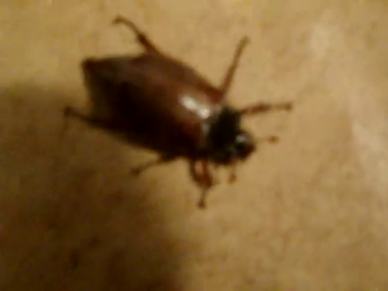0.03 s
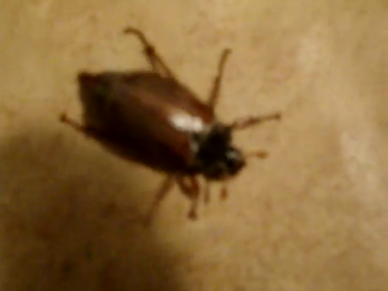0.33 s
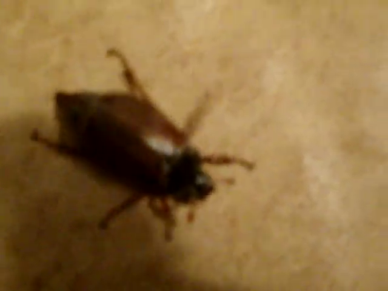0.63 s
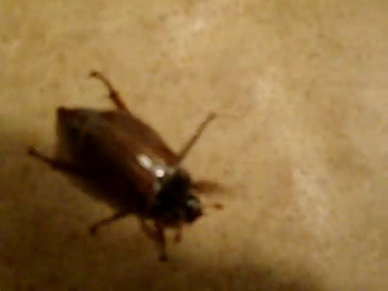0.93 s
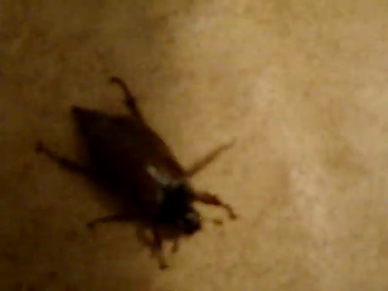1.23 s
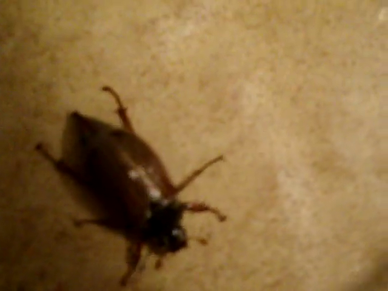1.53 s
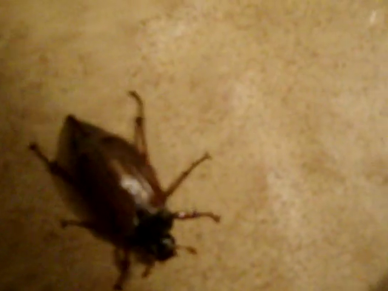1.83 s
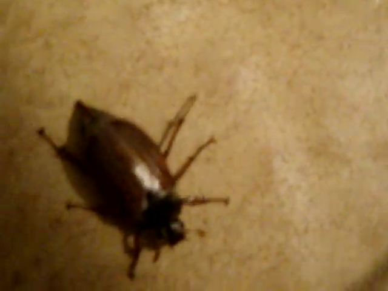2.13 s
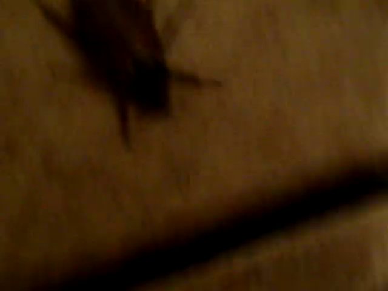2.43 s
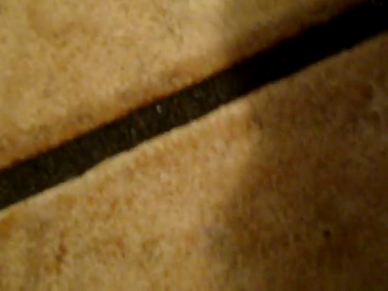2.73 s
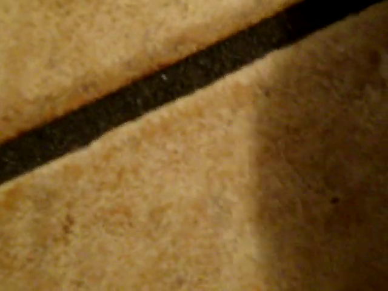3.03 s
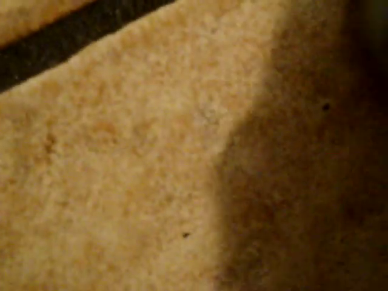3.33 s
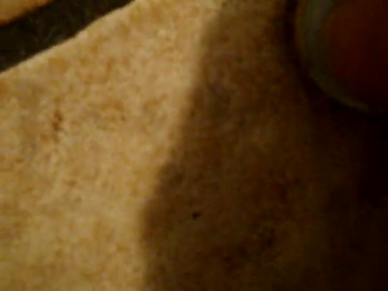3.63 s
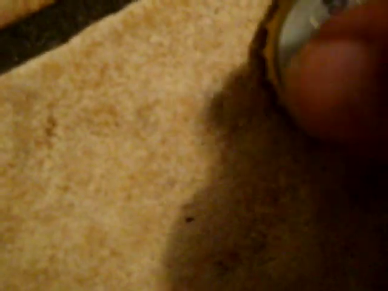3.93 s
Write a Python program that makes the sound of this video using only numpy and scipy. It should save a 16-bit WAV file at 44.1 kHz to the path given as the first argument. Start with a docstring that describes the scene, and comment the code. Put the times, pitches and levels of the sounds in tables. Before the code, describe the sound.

Fingers rub, scrape and squeak on a plastic casing right at the microphone, with a few sharp knocks. Before that, a quiet room holds only faint dry ticks, soft bumps and hand brushing over hiss and a thin hum.

```python
"""Fingers shift on a plastic casing close by, from 3.3 s: skin sticks and slips in a grainy rub, short
scrapes and squeaks that ring the casing, with a few sharp knocks. Before that, a quiet room where a
beetle is watched on a tiled floor: faint dry ticks, soft bumps and brushing of the hand.
Hiss and a thin hum run throughout."""
import sys
import numpy as np
from scipy import signal
from scipy.fft import rfft, irfft
from scipy.io import wavfile
from scipy.ndimage import uniform_filter1d

SR = 44100
rng = np.random.default_rng(int(sys.argv[2]) if len(sys.argv) > 2 else 0)


def output_pcm(signal):
    """Save a mono or channel-first signal as 16-bit PCM at the path in sys.argv[1].

    Samples are clipped to [-1, 1] before scaling.
    """
    pcm = np.clip(np.atleast_2d(signal).T, -1, 1) * 32767
    wavfile.write(sys.argv[1], SR, np.round(pcm).astype(np.int16))


N = 176400
TIME = np.arange(N) / SR


def fingers():
    """Skin on plastic: a broad rub, then thin scrapes, lower squeaks and crunches as the grip tightens."""
    # envelopes, one per stroke: t/s, level/dB
    rub_stroke = [(3.306, -59), (3.311, -22.5), (3.332, -26), (3.35, -19), (3.362, -16.5), (3.379, -18.5),
                  (3.386, -25), (3.42, -22.5), (3.445, -34), (3.468, -41.5), (3.485, -33.5), (3.507, -28.5),
                  (3.515, -20.5), (3.535, -26), (3.55, -23), (3.565, -30.5), (3.58, -85)]
    scrape_strokes = [
        [(3.638, -71), (3.643, -32), (3.652, -25), (3.657, -30), (3.665, -19.5), (3.672, -32.5), (3.68, -62),
         (3.684, -66)],
        [(3.692, -66), (3.707, -47), (3.718, -42), (3.73, -62)],
        [(3.768, -51), (3.779, -29.5), (3.789, -32), (3.797, -28.5), (3.806, -34), (3.812, -18.5),
         (3.83, -27.5), (3.842, -38), (3.862, -47)],
        [(3.868, -48), (3.893, -33), (3.908, -38), (3.918, -49)],
        [(3.925, -50), (3.935, -44), (3.948, -32), (3.962, -45), (3.97, -57)],
    ]
    squeak_strokes = [
        [(3.803, -42), (3.81, -32), (3.824, -21), (3.83, -23), (3.837, -18.5), (3.853, -38), (3.862, -36),
         (3.89, -29), (3.908, -42), (3.915, -61)],
        [(3.918, -37), (3.928, -36), (3.938, -27.5), (3.949, -24.5), (3.955, -52.5), (3.962, -65), (3.97, -72)],
        [(3.976, -63.5), (3.982, -23), (3.987, -48), (3.993, -47), (4.0, -48)],
    ]
    crunch_strokes = [
        [(3.806, -53), (3.81, -28), (3.819, -23), (3.824, -42), (3.832, -27.5), (3.841, -23), (3.85, -47)],
        [(3.928, -55), (3.934, -40), (3.944, -34), (3.953, -50), (3.958, -61)],
    ]
    # friction spectra: f/Hz, level/dB
    rub_colour = [(300, -46.5), (1100, -21.5), (1900, -12), (2600, 2.5), (3050, -3.5), (3650, 5),
                  (4550, -1), (5100, -11), (5900, -12.5), (7800, -32.5), (9400, -25), (10200, -57)]
    scrape_colour = [(400, -39), (1200, -26), (2400, -5), (3400, -3), (4600, 11.5), (5300, -14.5),
                     (7200, -26), (9500, -17.5), (10300, -34)]
    squeak_colour = [(400, -37), (1400, 3), (2300, -3), (3100, 20.5), (4000, -2), (4600, 10), (5400, -16),
                     (6300, -2), (7500, 5), (8800, -9), (10200, -20)]
    crunch_colour = [(500, 5), (1500, -7), (2600, 9.5), (4800, 3), (5600, -12), (6600, 2.5), (9400, 12),
                     (10200, -13)]
    # casing modes per grip: f/Hz, width/Hz, level/dB
    rub_modes = [(2500, 150, -22), (3575, 39, 14), (3800, 60, -17), (4330, 56, -2)]
    scrape_modes = [(4560, 260, 13), (4390, 140, -10)]
    squeak_modes = [(3310, 84, 9), (3200, 240, -1), (7340, 260, -25)]
    rub = friction(rub_colour, rub_modes, slips_per_s=1150,
                   ring_db=-11.5, even_s=0.0099, crackle_db=1, flicker_db=12.5)
    scrape = friction(scrape_colour, scrape_modes, slips_per_s=750,
                      ring_db=-5, even_s=0.005, crackle_db=4.5, flicker_db=10)
    squeak = friction(squeak_colour, squeak_modes, slips_per_s=600,
                      ring_db=4.5, even_s=0.0032, crackle_db=-2, flicker_db=10.5)
    crunch = friction(crunch_colour, scrape_modes, slips_per_s=910,
                      ring_db=-3.5, even_s=0.0069, crackle_db=3, flicker_db=-1)
    rub *= envelope(rub_stroke)
    scrape *= sum(map(envelope, scrape_strokes))
    squeak *= sum(map(envelope, squeak_strokes))
    crunch *= sum(map(envelope, crunch_strokes))
    low_cut = signal.butter(2, 1300, "high", fs=SR, output="sos")
    return signal.sosfilt(low_cut, rub + scrape + squeak + crunch)


def friction(spectrum, modes, slips_per_s, ring_db, even_s, crackle_db, flicker_db):
    """Stick-slip at unit level: unevenly timed slips shed ringing grains and excite the casing modes."""
    count, slip_spread_db, grain_spread_db, grit_db = 8000, 4, 7, -16
    clumps_per_s, flickers_per_s, treble_hz = 280, 130, 5400
    onsets = (np.cumsum(rng.gamma(2, 0.5, count)) / slips_per_s * SR).astype(int)
    inside = onsets < N
    sizes = from_db(slip_spread_db * np.clip(rng.standard_normal(count), -2, 1))
    grains = np.zeros(N)
    for hz in np.linspace(1500, 10000, 16):  # each slip favours its own few pitches
        share = from_db(grain_spread_db * np.minimum(rng.standard_normal(count), 1.5))
        kicks = sizes * share * rng.choice([-1, 1], count)
        grains += resonate(np.bincount(onsets[inside], kicks[inside], N), hz, width_hz=440)
    drive = unit_rms(grains) + from_db(grit_db) * rng.standard_normal(N)
    ringing = sum(from_db(db) * unit_rms(resonate(drive, hz, width_hz)) for hz, width_hz, db in modes)
    snaps = unit_rms(colour(drive, spectrum))
    dull = signal.sosfiltfilt(signal.butter(4, treble_hz, fs=SR, output="sos"), snaps)
    flicker = from_db(flicker_db * np.minimum(drift(flickers_per_s), 1))
    treble = (snaps - dull) * flicker
    clumps = from_db(crackle_db * drift(clumps_per_s))
    return even(clumps * (dull + treble + from_db(ring_db) * unit_rms(ringing)), even_s)


def knocks():
    """Hard contacts carried through the casing, bass included."""
    # impulses: t/s, relative level/dB
    hits = [(3.3097, -7), (3.811, -7.5), (3.8152, -11), (3.8272, 1.5), (3.832, -12), (3.8388, -12.5),
            (3.943, -6)]
    # casing response: f/Hz, level/dB
    casing_colour = [(30, -8.5), (150, -2), (500, -1), (1200, -1.5), (2200, -1), (3250, 17), (4300, -31),
                     (5500, 3), (8000, -2), (10000, -18)]
    clicks = np.zeros(N)
    for start_s, db in hits:
        add(clicks, start_s, from_db([db]))
    return from_db(6.5) * colour(clicks, casing_colour)


def chirps():
    """Slips lock to one resonance and squeal for milliseconds: quick attack, wavering hold, free decay."""
    # squeals: t/s, hold/s, level/dB, f/Hz
    squeals = [(3.647, 0.0024, -21.5, 4490), (3.6625, .002, -26, 4450), (3.664, 0.0032, -14, 4560),
               (3.675, 0.0016, -35, 3700), (3.7825, .003, -25, 4600), (3.81, 0.0047, -18, 4490),
               (3.8239, 0.0081, -11, 3470), (3.8455, 0.0084, -18.5, 3350), (3.856, 0.0024, -22, 3150),
               (3.9256, 0.0021, -22, 3130), (3.935, 0.01, -19, 3187), (3.9456, 0.006, -17.5, 3273),
               (3.947, 0.0049, -30, 7260), (3.961, .0015, -22.5, 3300), (3.9804, 0.0013, -21.5, 3310)]
    attack_s, t60_s = 0.00055, 0.01
    out, t = np.zeros(N), TIME[:SR // 10]
    waver_hz = 70 * drift(500)
    roughness = from_db(0.5 * drift(700))
    for start_s, hold_s, db, hz in squeals:
        span = slice(int(start_s * SR), int(start_s * SR) + len(t))
        decay_db = 60 * np.maximum(t - hold_s, 0) / t60_s
        shape = np.minimum(t / attack_s, 1) * from_db(db - decay_db)
        tone = roughness[span] * np.sin(2 * np.pi * np.cumsum(hz + waver_hz[span]) / SR)
        add(out, start_s, shape[:len(tone)] * tone)
    return out


def ticks():
    """Light hard contacts: a tiny crunch through one resonance, plus a broad bright snap."""
    # contacts: t/s, peak level/dB, f/Hz, width/Hz, snap re body/dB
    contacts = [(0.1755, -32.5, 1980, 1300, -5), (0.257, -36, 5500, 1300, -20), (0.628, -32, 1000, 1200, 0),
                (0.816, -35.5, 2540, 700, 2), (1.2676, -24, 2020, 1080, -6), (1.4439, -34, 1430, 347, 0.5),
                (1.553, -38, 2800, 1000, -8), (2.269, -35.5, 2430, 600, -12), (2.804, -36, 2570, 900, -15),
                (2.8305, -22.5, 2450, 980, -15), (2.868, -33, 2480, 900, -4)]
    out = np.zeros(N)
    for start_s, db, hz, width_hz, snap_db in contacts:
        crunch = burst(t60_s=0.015)
        body = resonate(resonate(crunch, hz, width_hz), hz, 2 * width_hz)
        snap = resonate(crunch, hz=3650, width_hz=2900)
        tick = unit_rms(body) + from_db(snap_db) * unit_rms(snap)
        add(out, start_s, from_db(db) * tick / np.abs(tick).max())
    return out


def bumps():
    """Soft hand contacts: a dull puff through one low resonance."""
    # contacts: t/s, peak level/dB, f/Hz, width/Hz
    contacts = [(0.174, -44, 271, 262), (0.182, -40.5, 420, 129), (0.628, -46, 415, 200),
                (0.641, -40, 364, 200), (0.652, -37, 320, 330), (0.888, -41, 398, 180),
                (1.038, -38, 360, 353), (1.94, -39, 410, 298), (2.073, -41, 282, 110),
                (2.881, -47, 270, 280), (3.26, -43, 290, 201)]
    out = np.zeros(N)
    for start_s, db, hz, width_hz in contacts:
        puff = burst(t60_s=0.028)
        bump = resonate(resonate(puff, hz, width_hz), hz, 2 * width_hz)
        add(out, start_s, from_db(db) * bump / np.abs(bump).max())
    return out


def room(x):
    """Diffuse floor and wall reflections, arriving after 5 ms."""
    tail = burst(t60_s=0.08) * (TIME[:SR // 5] > 0.005)
    return signal.fftconvolve(x, tail / np.sqrt(np.sum(tail ** 2)))[:N]


def hand_brushing():
    """Faint hand movement: grainy brushing, airy swishes on top, low lumpy shuffling."""
    # envelopes (air: one per swish): t/s, level/dB
    brush_curve = [(0, -56.5), (0.55, -55.5), (0.66, -51.5), (0.76, -55), (0.82, -52), (0.9, -52.5),
                   (0.95, -55.5), (1.22, -53.5), (1.3, -53), (1.5, -58), (1.7, -58.5), (2.12, -58),
                   (2.27, -53.5), (2.42, -49.5), (2.55, -52.5), (2.78, -50), (3.0, -55.5), (3.12, -49.5),
                   (3.26, -51.5), (3.6, -56), (3.75, -70), (4, -61)]
    air_swishes = [
        [(0.68, -72), (0.74, -50), (0.78, -65), (0.83, -51), (0.9, -56), (0.93, -70)],
        [(2.3, -69), (2.4, -55), (2.6, -75), (2.8, -62), (3.1, -60.5), (3.3, -66)],
    ]
    shuffle_curve = [(0, -62), (0.24, -56.5), (0.45, -59), (0.68, -55), (0.95, -57), (1.2, -56.5),
                     (1.55, -62), (1.9, -67), (2.15, -57), (2.45, -62.5), (2.85, -54.5), (3.1, -61),
                     (3.3, -61.5), (4, -64)]
    # spectra: f/Hz, level/dB
    brush_colour = [(150, -30.5), (400, -1), (1200, -5), (2500, -1), (3600, -3), (6000, -3), (10000, -19.5)]
    air_colour = [(2000, -25), (5000, -19), (7500, 13), (9500, 2)]
    shuffle_colour = [(30, -25), (90, -14), (170, -0.5), (240, 0.5), (450, -2.5), (750, -2.5), (2000, -22)]
    grain = rng.standard_normal(N) * from_db(1.6 * drift(350))
    lumps = rng.standard_normal(N) * from_db(1.5 * drift(30))
    brush = envelope(brush_curve) * unit_rms(colour(grain, brush_colour))
    air = sum(map(envelope, air_swishes)) * unit_rms(colour(rng.standard_normal(N), air_colour))
    shuffle = envelope(shuffle_curve) * unit_rms(colour(lumps, shuffle_colour))
    return brush + air + shuffle


def hiss_and_hum():
    """Steady room hiss and a thin, slightly wavering tone."""
    # hiss spectrum: f/Hz, level/dB
    hiss_colour = [(15, -64), (25, -21.5), (181, -18), (284, -9.5), (546, -5.5), (795, -10.5), (1070, -6.5),
                   (1490, -10), (2580, -11), (3000, -16), (4480, -15), (10000, -18.5), (13000, -61),
                   (22000, -120)]
    hiss_db, hum_db = -54.5, -63
    hiss = unit_rms(colour(rng.standard_normal(N), hiss_colour))
    hum_hz = 551.5 + 2.21 * drift(9.9)
    hum = np.sqrt(2) * np.sin(2 * np.pi * np.cumsum(hum_hz) / SR)
    return from_db(hiss_db) * hiss + from_db(hum_db) * hum


def from_db(db):
    """Decibels to gain."""
    return 10 ** (np.asarray(db) / 20)


def unit_rms(x):
    """Scale to unit power."""
    return x / np.sqrt(np.mean(x ** 2) + 1e-20)


def envelope(curve):
    """Gain along a (t/s, level/dB) curve, zero outside it."""
    times_s, db = np.transpose(curve)
    return from_db(np.interp(TIME, times_s, db)) * (TIME >= times_s[0]) * (TIME <= times_s[-1])


def drift(rate_hz):
    """Random wander, unit RMS."""
    return unit_rms(np.interp(TIME * rate_hz, np.arange(4000), rng.standard_normal(4000)))


def colour(x, points):
    """Minimum-phase filter through (f/Hz, level/dB) points."""
    size = 4096
    hz, db = np.transpose(points)
    grid_hz = np.maximum(np.arange(size // 2 + 1) * SR / size, 1)
    gain = from_db(np.interp(np.log(grid_hz), np.log(hz), db))
    cepstrum = irfft(np.log(gain))
    cepstrum[1:size // 2] *= 2  # fold onto the causal half
    cepstrum[size // 2 + 1:] = 0
    return signal.fftconvolve(x, irfft(np.exp(rfft(cepstrum))))[:len(x)]


def resonate(x, hz, width_hz):
    """Two-pole resonance, unit peak gain."""
    radius = np.exp(-np.pi * width_hz / SR)
    feedforward = np.array([1, 0, -1]) * (1 - radius ** 2) / 2
    feedback = [1, -2 * radius * np.cos(2 * np.pi * hz / SR), radius ** 2]
    return signal.lfilter(feedforward, feedback, x + 1e-18)


def even(x, window_s):
    """Hold the running RMS at one, keeping the finer grain."""
    power = uniform_filter1d(x ** 2, max(int(window_s * SR), 2))
    return x / np.sqrt(np.abs(power) + 1e-12)


def add(track, start_s, sound):
    """Mix a sound into a track in place."""
    start = int(start_s * SR)
    track[start:start + len(sound)] += sound[:N - start]


def burst(t60_s):
    """Decaying noise puff."""
    t = TIME[:SR // 5]
    return rng.standard_normal(len(t)) * from_db(-60 * t / t60_s)


def scene():
    """Dry handling, small contacts with reflections, background; mono."""
    handling = fingers() + knocks() + chirps()
    contacts = ticks() + bumps()
    reflections = from_db(-7.5) * room(contacts)
    background = hiss_and_hum() + hand_brushing()
    return (handling + contacts + reflections + background)[None]


def record(dry):
    """Steep elliptic low-pass."""
    cutoff_hz = 10150
    return signal.sosfilt(signal.ellip(12, 0.2, 75, cutoff_hz, fs=SR, output="sos"), dry)


dry = scene()
out = record(dry)
output_pcm(out)
```